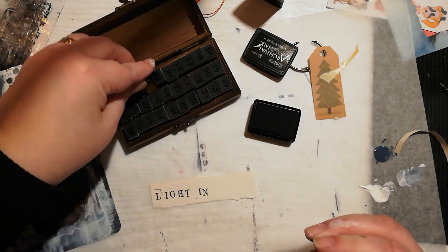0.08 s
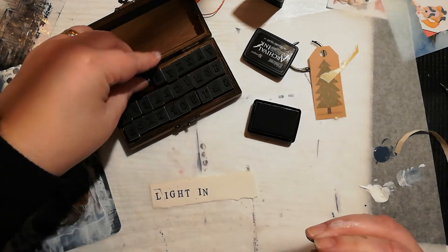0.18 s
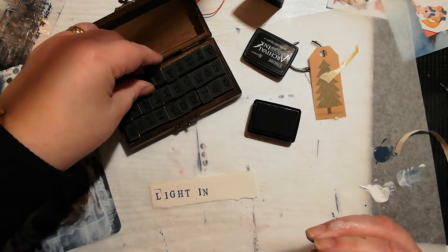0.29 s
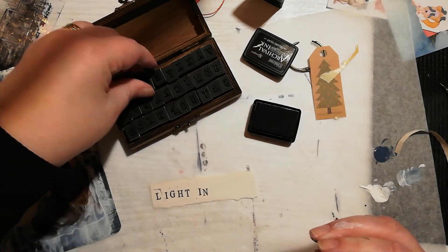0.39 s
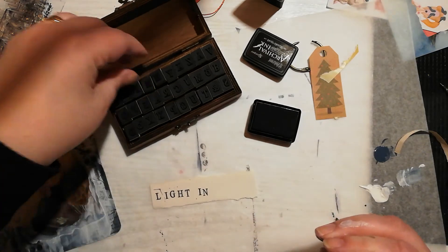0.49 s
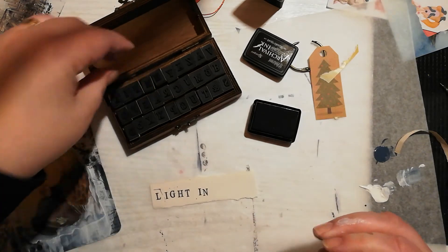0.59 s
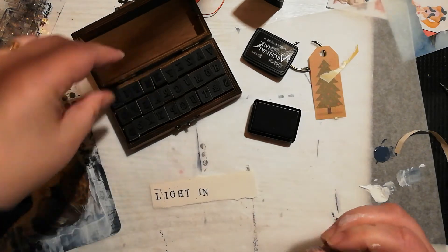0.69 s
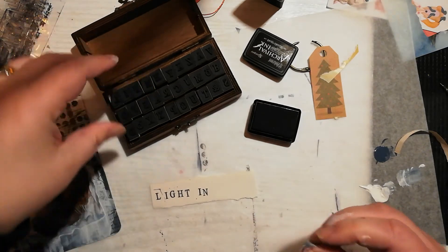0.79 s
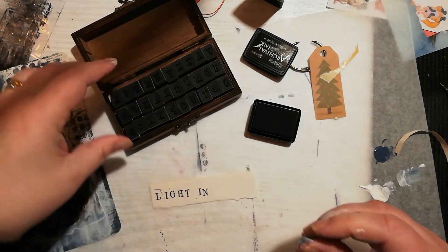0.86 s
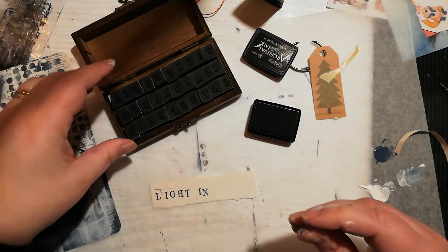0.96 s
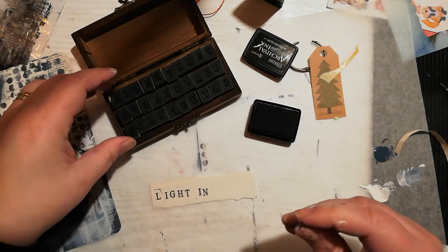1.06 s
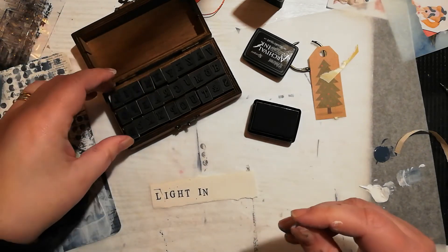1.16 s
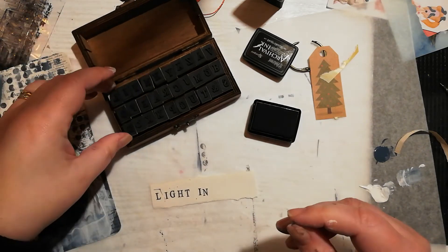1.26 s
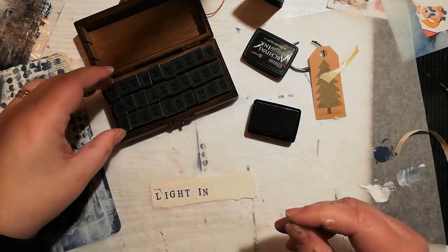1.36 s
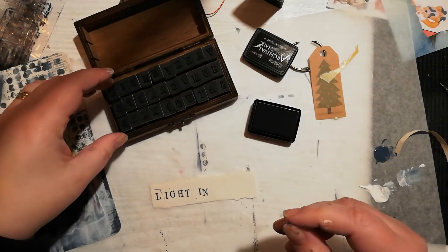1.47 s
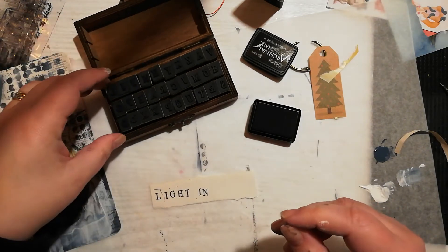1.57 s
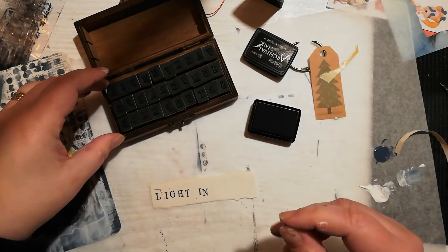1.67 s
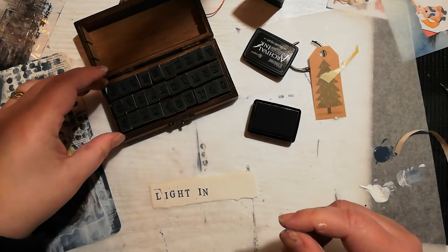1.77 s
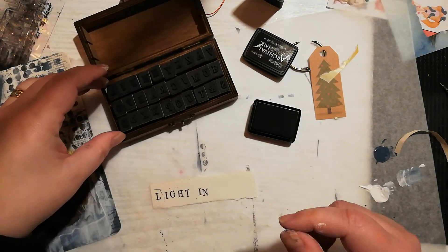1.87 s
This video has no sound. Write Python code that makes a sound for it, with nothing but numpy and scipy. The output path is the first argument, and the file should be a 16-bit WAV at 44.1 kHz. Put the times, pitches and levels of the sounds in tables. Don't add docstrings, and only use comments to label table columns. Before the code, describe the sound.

Small wooden stamps knock in a wooden box, close and dry. A light tap at 0.02 s, soft sliding and squeaking, then a sharp knock at 0.21 s with rattling to 0.3 s. Softer knocks at 0.35 s lead to the hardest clack at 0.40 s, bouncing and chattering until 0.5 s. Quiet room hiss follows; faint rubbing from 0.9 s, a dull fingertip tap at 1.27 s, gritty skin rub and bright nail tick at 1.4 s.

```python
import sys
import numpy as np
from scipy import signal
from scipy.fft import rfft, irfft
from scipy.io import wavfile
from scipy.ndimage import uniform_filter1d

SR = 44100
rng = np.random.default_rng(int(sys.argv[2]) if len(sys.argv) > 2 else 0)


def field_ratio(decibels):
    return 10 ** (np.asarray(decibels, dtype=float) / 20)


def wav_out(sig):
    wavfile.write(sys.argv[1], SR, np.round(np.clip(np.atleast_2d(sig).T, -1, 1) * 32767).astype(np.int16))


N = 83790

# [f/Hz, level re blow/dB, t60/s, left-right/dB]
BOX = [(1250, -58, 0.0073, -3.5), (1620, -29, .02, -3), (1820, -6.5, 0.025, -3), (7170, -17, .015, -7.5),
       (8270, -22.5, 0.013, -11), (9100, -15.5, .012, -11.5), (9750, -22.5, 0.021, -18.5)]
# [f/Hz, level re blow/dB, t60/s, left-right/dB]
FLOOR = [(940, -18.5, .04, -0.5), (1224, -19, 0.037, -3.5), (2220, -26.5, 0.035, 2), (2770, -22, 0.024, 0),
         (3100, -32, 0.027, 1.5), (3656, -26, 0.035, 14.5), (3984, -20, 0.011, 5.5),
         (4700, -15.5, 0.00977, 3.5), (5130, -13.5, .015, -3.5), (5580, -23, 0.0061, -2.5)]
PUSH_S, DROP_S, LANDING_S = 0.00031, 0.00034, 0.00025
PUSH_CRACK_DB, DROP_CRACK_DB = -16.5, -24.5
LAG_S, LANDING_LAG_S = 0.00002, 0.000055


def evened(x):
    return x / np.sqrt(np.mean(x ** 2) + 1e-20)


def read(points, hz):
    f, value = np.transpose(points)
    return np.interp(np.log(hz + 1), np.log(f + 1), value)


def sides(lr_db):
    return field_ratio(np.array([[0.5], [-0.5]]) * lr_db)


def shaped(x, gain):
    return irfft(rfft(x) * gain(np.fft.rfftfreq(x.shape[-1], 1 / SR)), x.shape[-1])


def bell(hz, width_hz):
    return lambda f: 1 / (1 + (2 * (f - hz) / width_hz) ** 2)


def shared_noise(same):
    return lambda a, b: np.array([a, same * a + np.sqrt(1 - np.minimum(same, 1) ** 2) * b])


def blip(s, hz, spread_s):
    out = np.zeros(N)
    at = round(s * SR) + np.arange(-250, 250)
    t = at / SR - s
    out[at] = np.exp(-0.5 * (t / spread_s) ** 2) * np.cos(2 * np.pi * hz * t)
    return out


def blow(s, hz, rise_s, t60):
    out = np.zeros(N)
    at = round(s * SR) + np.arange(-100, 600)
    t = at / SR - s
    swell = np.exp(-0.5 * (t / rise_s) ** 2)
    decay = field_ratio(-60 * abs(t) / t60)
    out[at] = np.where(t < 0, swell, decay) * np.cos(2 * np.pi * hz * t)
    return out


def room():
    # [f/Hz, density/dB]
    hiss = [(12, -31.5), (20, -7), (104, -9), (176, -14.5), (283, -11.5), (537, -19), (635, -18),
            (1510, -16.5), (15700, -31)]
    # [f/Hz, correlation]
    likeness = [(60, 0.98), (150, 0.97), (380, -0.33), (950, -0.19), (2380, -0.02), (5980, 0.43),
                (15000, 0.07)]
    # [f/Hz, level/dB, width/Hz]
    hum_rows = [(27.32, -72.5, 6), (101, -75, 13.8), (204.2, -81.5, 14), (9160, -81.5, 1500)]
    a, b = rfft(rng.standard_normal((2, N)))
    same = np.clip(read(likeness, np.fft.rfftfreq(N, 1 / SR)), -1, 1)
    noise = irfft(shared_noise(same)(a, b), N)
    hums = sum(field_ratio(db) * evened(shaped(noise, bell(hz, width))) for hz, db, width in hum_rows)
    return field_ratio(-65) * evened(shaped(noise, lambda f: field_ratio(read(hiss, f)))) + hums


def echoes(x):
    level_db, t60 = -14, 0.12
    t = np.arange(9000) / SR
    present = (rng.random((2, 9000)) < 0.05) * (t > 0.003)
    taps = rng.choice([-1., 1.], (2, 9000)) * present * field_ratio(-60 * t / t60)
    return field_ratio(level_db) * signal.fftconvolve(x, taps / np.linalg.norm(taps[0]), axes=1)[:, :N]


def strokes(times, rows, width, grit, same):
    t, out = np.arange(N) / SR, np.zeros((2, N))
    for s, (rise_s, fall_s, db, hz) in zip(times, rows):
        a, b, c = rng.standard_normal((3, N))
        roughness = np.exp(grit * evened(uniform_filter1d(c, 60)))
        noise = shared_noise(same)(a, b) * roughness
        u = np.where(t < s, (s - t) / rise_s, (t - s) / fall_s)
        band = evened(shaped(noise, bell(hz, max(width * hz, 60.0))))
        out += field_ratio(db) * np.exp(-2 * u ** 2) * band
    return out


def squeaks():
    times = [.015, .19, .195, .197, .2, .282, .42, 1.2, 1.355, 1.365, 1.39, 1.402]
    # [rise/s, fall/s, level/dB, f/Hz]
    rows = [(0.018, 0.033, -56.5, 112), (0.0081, .008, -53, 3150), (0.0057, 0.013, -56.5, 275),
            (0.0057, .014, -48, 4660), (.015, 0.019, -54.5, 9600), (0.012, 0.03, -58.5, 117),
            (.02, 0.025, -59.5, 125), (0.031, 0.027, -67.5, 4360), (0.045, .06, -68.5, 2350),
            (0.052, 0.032, -59, 497), (0.067, 0.018, -64.5, 1000), (0.013, 0.06, -61, 178)]
    return strokes(times, rows, width=.16, grit=0.34, same=0.99)


def rubs():
    times = [.125, .142, .145, .2, .225, .41, .405, .92, .97, 1.055, 1.205, 1.206, 1.3, 1.35, 1.39, 1.395,
             1.4, 1.385]
    # [rise/s, fall/s, level/dB, f/Hz]
    rows = [(0.031, 0.063, -61, 430), (0.058, 0.042, -60, 8000), (0.063, 0.026, -59.5, 3100),
            (0.023, .015, -54, 7800), (0.0069, 0.12, -63, 7400), (0.01, .07, -70, 7500),
            (0.0088, 0.077, -64, 260), (0.0061, .008, -76, 6200), (0.073, 0.08, -62, 9600),
            (0.0067, 0.006, -63, 10500), (0.0473, 0.028, -65, 7500), (.04, 0.018, -65, 4300),
            (0.13, 0.06, -64, 2730), (0.081, 0.11, -66, 403), (0.045, 0.066, -63, 1460),
            (0.062, 0.045, -55, 3080), (0.042, 0.03555, -52, 7950), (0.13, 0.029, -62, 8000)]
    return strokes(times, rows, width=0.8, grit=0.22, same=0.26)


def bright_ticks():
    # [t/s, peak level/dB, f/Hz]
    rows = [(.1418, -53.5, 8800), (0.47, -49, 4600), (.3304, -53.5, 5570), (.3303, -61, 10000),
            (1.392, -45, 9330), (1.402, -51.5, 4100), (1.4029, -35.5, 9900), (1.404, -48, 13660),
            (1.4031, -42, 6440), (1.410, -47.5, 9300)]
    spread_s = 0.00044
    return sum(field_ratio(db) * blip(s, hz, spread_s) * (1 + 0.5 * rng.standard_normal((2, N)))
               for s, db, hz in rows)


def fingertip_taps():
    # [t/s, peak level/dB, f/Hz]
    rows = [
        (1.255, -56, 1320),
        (1.2709, -46.5, 2220),
        (1.274, -54.5, 2800),
        (1.276, -57, 2130),
    ]
    return sum(field_ratio(db) * blip(s, hz, 0.0012) for s, db, hz in rows)


def placed(bright):
    # [f/Hz, left-right/dB]
    side = [(1500, 6), (4500, 1), (8000, -9), (15000, -6)]
    left = shaped(bright[0], lambda f: field_ratio(0.5 * read(side, f)))
    right = shaped(bright[1], lambda f: field_ratio(-0.5 * read(side, f)))
    return np.array([left, right])


def box(drive, modes):
    t = np.arange(4000) / SR
    ring = sum(sides(lr_db) * field_ratio(db - 60 * t / t60) * np.sin(2 * np.pi * hz * t)
               for hz, db, t60, lr_db in modes)
    return signal.fftconvolve(drive, ring, axes=1)[:, :N]


def chatter():
    # [t/s, level/dB]
    force_points = [(0, -56.5), (0.011, -66.5), (0.018, -52.5), (.04, -81.5), (0.172, -67), (.195, -48.5),
                    (.213, -64.5), (0.225, -50.5), (0.274, -56), (0.311, -67), (.34, -60.5), (.375, -66.5),
                    (0.399, -61), (0.403, -42.5), (0.428, -49.5), (.47, -54.5), (.52, -81), (.6, -100)]
    slips_per_s, spread_db = 1800, 5.5
    size = field_ratio(spread_db * np.minimum(rng.exponential(1, (2, N)), 3))
    size *= rng.random((2, N)) < slips_per_s / SR
    size *= rng.choice([-1., 1.], (2, N))
    slips = shaped(size + 1.1 * size[::-1], bell(2500, 3400.0))
    force = field_ratio(np.interp(np.arange(N) / SR, *np.transpose(force_points)))
    wood_rms = box(slips, BOX + FLOOR).std()
    return force * 1.07 * evened(slips) + 0.63 * box(force * slips, BOX + FLOOR) / wood_rms


def rattles():
    # [t/s, peak level/dB, f/Hz, left-right/dB]
    rows = [(.1827, -46, 2800, -3), (.2013, -42, 2830, -3), (.2326, -47.5, 1670, 1),
            (.2358, -41.5, 1680, 6), (.2398, -47, 2400, 1), (.2441, -45, 2220, -4.5),
            (.2472, -43.5, 2560, 7.5), (.252, -44, 2650, 4), (.2545, -44.5, 2180, 6.5),
            (.2589, -43, 1850, 6), (0.259, -44.5, 2700, 4.5), (.2635, -44.5, 1720, 13),
            (.2673, -43, 2100, 4.5), (.27, -44, 1830, 0), (.273, -41, 2680, 6), (.2776, -47, 2580, 4),
            (.2822, -45, 2580, 4), (.2897, -54, 3000, 14), (.2923, -51.5, 2350, 5), (.3224, -55, 2670, 1.5),
            (.3313, -49.5, 1500, 0.5), (.3416, -48, 1740, 1), (.343, -47.5, 3530, 0.5),
            (.3469, -50, 3670, -2), (.3629, -49.5, 2860, 8.5), (.3794, -53, 3010, 2),
            (.4187, -38.5, 3320, -0.5), (.4235, -33.5, 1790, 0), (.4308, -42, 2560, 9),
            (0.4362, -37.5, 1790, -1), (.4382, -37, 1790, -0.5), (.4476, -46, 1760, 4),
            (.4532, -45, 3120, -3), (.4609, -50, 2410, 1), (.4651, -55, 1810, -1), (.468, -71, 1830, 0),
            (.4723, -49, 3580, 10), (.4778, -50, 2990, -1), (.4813, -54, 1830, 2), (.4856, -63, 1970, 12),
            (.4905, -53, 3600, 4), (.5033, -57, 2930, 5)]
    rise_s, t60 = 0.0004, 0.011
    return sum(field_ratio(db) * sides(lr_db) * blow(s, hz, rise_s, t60) for s, db, hz, lr_db in rows)


def knocks(rows, modes, contact_s, t60, crack_db, lag_s=LAG_S):
    drive_s = 0.00016
    edge_db, edge_hz, edge_s = -10, 4900, 0.00005
    hard_db, soften = -10, 0.32
    crack_t60, crack_hz, crack_width_hz = 0.013, 7000, 7930
    heard, drive, start = np.zeros((3, 2, N))
    area = SR * np.sqrt(np.pi / 2)
    for s, db, hz, lr_db in rows:
        hard = field_ratio(soften * min(db - hard_db, 0))
        for k, at in enumerate((s + lag_s, s)):
            size = field_ratio(db) * sides(lr_db)[k]
            peak_s = at + 2 * contact_s
            edge = hard * blip(at + contact_s, edge_hz, edge_s)
            push = blip(peak_s - 1 / (4 * hz), hz, drive_s)
            heard[k] += size * blow(peak_s, hz, contact_s, t60)
            drive[k] += size * (push / drive_s + field_ratio(edge_db) * edge / edge_s) / area
            start[k, round((at + contact_s) * SR)] = hard * size[0]
    fade = signal.lfilter([1], [1, -field_ratio(-60 / crack_t60 / SR)], start)
    splinters = shaped(rng.standard_normal((2, N)), lambda f: bell(crack_hz, crack_width_hz)(f) ** 2)
    return np.array([heard + box(drive, modes), field_ratio(crack_db) * fade * evened(splinters)])


def first_tap():
    # [t/s, peak level/dB, contact f/Hz, left-right/dB]
    rows = [
        (.0163, -38, 2850, 0.93),
    ]
    # [f/Hz, level re blow/dB, t60/s, left-right/dB]
    lid = [(1830, 8.5, 0.0093, 4), (2850, -6.5, 0.03, 10), (3300, -11, 0.027, 6), (4000, -10, 0.029, 4)]
    return knocks(rows, lid, PUSH_S, 0.0035, PUSH_CRACK_DB)


def pushes():
    # [t/s, peak level/dB, contact f/Hz, left-right/dB]
    rows = [
        (.0945, -53.5, 3840, 9),
        (.1415, -67, 2600, -6),
        (.164, -48, 3020, -1),
        (.2055, -34, 3200, 2),
        (.2148, -11.5, 2300, 2.5),
        (.2230, -30, 2300, -5.5),
        (.330, -45.5, 3220, -2),
        (.3385, -44, 3520, 1.5),
        (.3522, -30.5, 2700, 6.5),
        (.3546, -34, 2940, 4),
    ]
    # [f/Hz, level re blow/dB, t60/s, left-right/dB]
    wall = [(2300, -25, 0.02, 0), (2675, -13.5, .03, 8.5), (2700, -18, .025, 16.5), (3270, -30, .02, 1.5),
            (4170, -21, .025, 3), (4733, -12.5, 0.018, -11.5), (4966, -10.5, 0.014, -6.5)]
    return knocks(rows, BOX + wall, PUSH_S, 0.0032, PUSH_CRACK_DB)


def drops():
    # [t/s, peak level/dB, contact f/Hz, left-right/dB]
    rows = [(.3835, -43.5, 3400, 0.5), (.3845, -36.5, 1804, -1.5), (.3888, -30, 2500, 0.5),
            (.4070, -24, 2600, 1), (.4088, -25.5, 3300, 3), (.4106, -29, 2860, 2), (.4125, -30, 3560, 3),
            (.422, -28, 2540, 4.5), (.434, -29.5, 2580, 7.5), (.442, -33.5, 2900, 4.5),
            (.4562, -42, 2610, 13), (.500, -56, 2920, 20)]
    return knocks(rows, BOX + FLOOR, DROP_S, 0.0059, DROP_CRACK_DB)


def landing():
    # [t/s, peak level/dB, contact f/Hz, left-right/dB]
    rows = [
        (0.4001, -8, 3270, -1),
    ]
    # [f/Hz, level re blow/dB, t60/s, left-right/dB]
    bed = [(1480, -21.5, .008, 0), (1790, -8, .015, 2), (3731, -9, .007, 7.5), (4250, -11.5, 0.0091, -4),
           (5140, -12.5, 0.0045, -4), (5740, -26, .006, 0)]
    return knocks(rows, BOX + FLOOR + bed, LANDING_S, 0.005, DROP_CRACK_DB, LANDING_LAG_S)


def scene():
    blows, crack = pushes() + drops() + first_tap() + landing()
    low_cut = signal.butter(6, 1220, "high", fs=SR, output="sos")
    wood = signal.sosfilt(low_cut, blows + rattles() + chatter())
    bright = placed(rubs() + bright_ticks() + fingertip_taps() + crack)
    return wood + echoes(wood + crack) + bright + squeaks() + room()


def band_limit(x):
    return signal.sosfilt(signal.butter(12, 15830, fs=SR, output="sos"), x)


def record(dry):
    top_hz = 15830
    mix = shaped(dry, lambda f: f < top_hz)
    return band_limit(mix)


dry = scene()
out = record(dry)
wav_out(out)
```